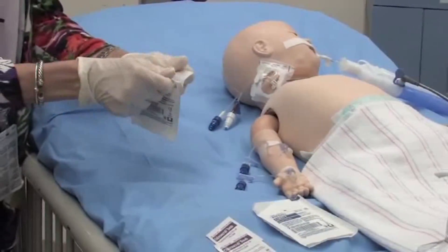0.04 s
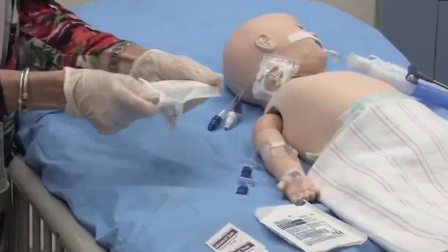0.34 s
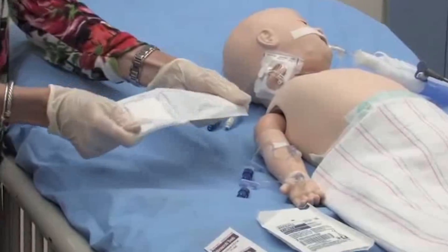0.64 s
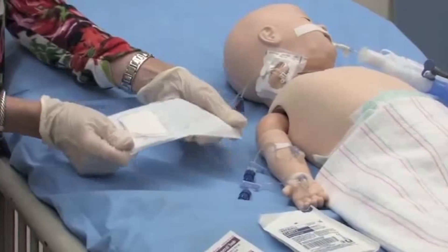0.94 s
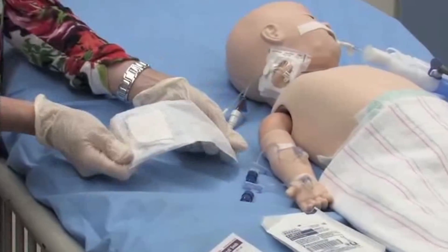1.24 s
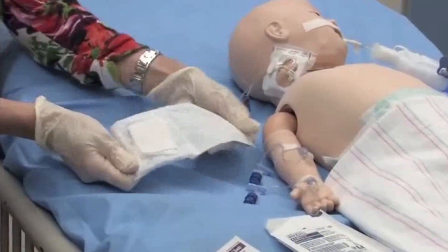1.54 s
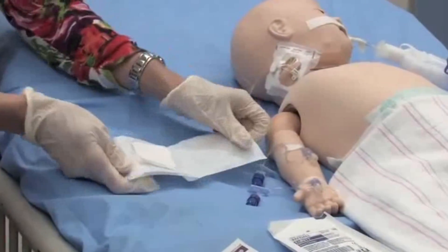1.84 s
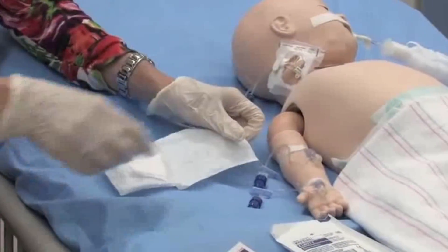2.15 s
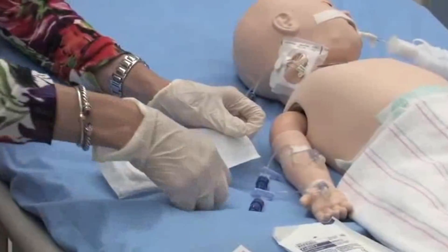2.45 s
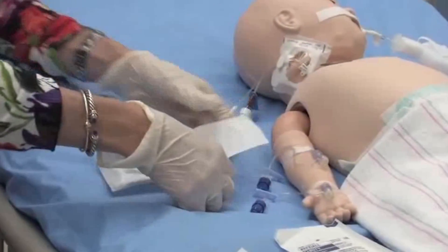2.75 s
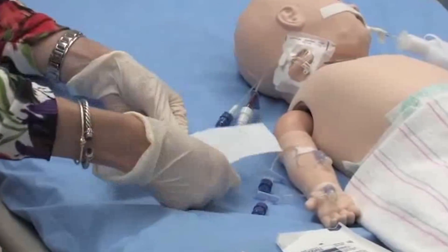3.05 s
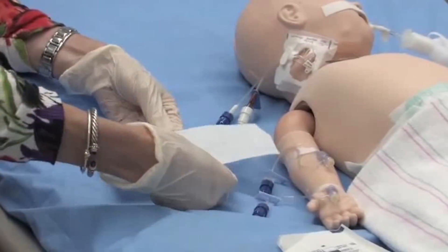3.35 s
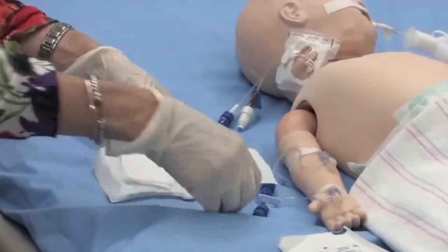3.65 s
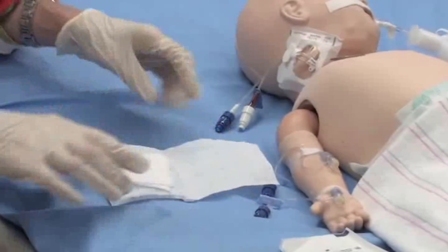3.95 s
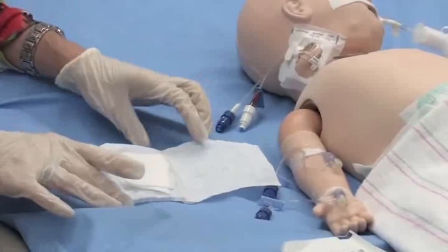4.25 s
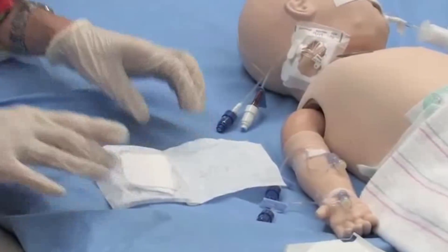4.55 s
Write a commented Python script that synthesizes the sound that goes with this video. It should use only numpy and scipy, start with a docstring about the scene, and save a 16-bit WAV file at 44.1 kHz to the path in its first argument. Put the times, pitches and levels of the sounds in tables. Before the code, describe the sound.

A paper packet is peeled open with a short rip and dense crinkling, then a few lighter crackles and fading rustles on bedding.

```python
"""Gloved hands peel open a paper gauze packet and spread it on a bed, in a small quiet room.
From the start the bedding rumbles under the hands, and stick-slip friction on the cloth hisses.
From 0.3 to 0.8 s the seal tears in a dense run of fibre fractures that drum on the taut paper.
The stiff wrapper buckles in sharp snaps, thickly until 2 s and again around 3 s, both times with
soft pushes on the mattress. Last, paper and gloves slide over the cloth in ever fainter strokes."""
import sys
import numpy as np
from scipy import signal
from scipy.fft import rfft, irfft
from scipy.io import wavfile

SR = 44100
rng = np.random.default_rng(int(sys.argv[2]) if len(sys.argv) > 2 else 0)


def int16_out(signal):
    """Quantize to a 16-bit WAV file."""
    q = np.round(np.clip(np.atleast_2d(signal).T, -1, 1) * 32767)
    wavfile.write(sys.argv[1], SR, q.astype(np.int16))


N = 212253
TIME = np.arange(N) / SR

# background spectrum of the room: f/Hz, level/dB
AIR_SPECTRUM = [(100, -11.5), (200, -9), (450, -13.5), (650, -16), (900, -15.5), (1400, -10.5), (2000, -21),
                (3500, -27), (5500, -23.5), (7500, -41), (10500, -42)]
# hands leaning on the bedding: start t/s, duration/s, rumble level/dB
HAND_LEANS = [(-0.03, 0.097, -40), (0.1, 0.8, -42), (0.88, 0.47, -40.5), (1.653, 0.21, -41.5),
              (1.93, 0.22, -43.5), (2.75, 0.39, -45), (3.23, 0.31, -41), (4.075, 0.12, -46.5)]
# rumble spectrum of the bedding: f/Hz, level/dB
RUMBLE_SPECTRUM = [(10, 0), (25, -5.5), (40, 1.5), (60, -5.5), (92, -12), (120, -5), (200, -15.5),
                   (320, -17), (500, -29.5), (1000, -40.5), (3000, -78.5)]
# soft pushes on the mattress: t/s, level/dB, f/Hz
MATTRESS_PUSHES = [(0.809, -27, 60), (1.101, -28, 65), (2.779, -31.5, 55), (3.249, -25.5, 52),
                   (3.491, -30.5, 50)]
# strokes over the cloth: start t/s, duration/s, hiss level/dB, flexing level/dB, fizz level/dB re hiss
CLOTH_STROKES = [(-0.03, 0.031, -41, -42.5, -6), (0.036, 0.04, -54.5, -44, 0),
                 (0.112, 0.17, -45, -44, -5.5), (0.292, 0.4, -34, -39.5, 0), (0.766, 0.074, -33, -35, -5),
                 (0.878, 0.098, -38, -34.5, -9.5), (1.079, 0.13, -35, -34.5, -11),
                 (1.265, 0.098, -47, -47.5, -11), (1.5, 0.07, -79, -53, -15), (1.601, 0.13, -53, -47.5, -3),
                 (1.75, 0.073, -45.5, -43.5, -12), (1.868, 0.086, -55.5, -56.5, -12),
                 (1.921, 0.24, -44, -51, -9), (2.252, 0.025, -60, -60.5, -13),
                 (2.38, 0.032, -63.5, -71, -15), (2.495, 0.051, -51, -57, -8.5),
                 (2.577, 0.045, -52, -55, -7), (2.734, 0.15, -48, -49, -3.5),
                 (2.914, 0.041, -41.5, -47, -5.5), (2.973, 0.14, -50.5, -52, -4),
                 (3.144, 0.065, -56.5, -52.5, -8), (3.231, 0.052, -43, -40, -17),
                 (3.309, 0.15, -54, -50.5, -16), (3.548, 0.2, -47, -48, -11),
                 (3.775, 0.16, -50.5, -55.5, -9.5), (4.06, 0.062, -62.5, -58.5, -13),
                 (4.168, 0.17, -60, -64.5, -9), (4.394, 0.04, -60.5, -77, -11),
                 (4.564, 0.036, -63, -62, -16.5), (4.722, 0.099, -66, -63.5, -18)]
# spectrum of fine slips on cloth: f/Hz, level/dB
HISS_SPECTRUM = [(900, -22), (2000, -2.5), (2500, -9.5), (3100, -12.5), (4200, -2), (5200, -4.5),
                 (6300, -4.5), (7500, -5), (8500, -5.5), (10000, -19)]
# spectrum of the high fizz of those slips: f/Hz, level/dB
FIZZ_SPECTRUM = [(3000, -26), (6500, -4.5), (8500, 29), (10300, 7)]
# response of the slack wrapper lying on cloth: f/Hz, level/dB
SLACK_PAPER = [(200, -5), (350, -6), (550, -5.5), (850, -3.5), (1300, 3), (1700, 0), (2200, -10),
               (3200, -21), (6000, -61.5)]
# clear buckles of the wrapper: t/s, crack level/dB, crack f/Hz, ring level/dB re crack, ring f/Hz
BUCKLES = [(0.009, -32, 3560, -18, 1410), (0.093, -36, 3900, 0.5, 1100), (0.118, -29, 4700, -4, 895),
           (0.134, -25.5, 4000, -7.5, 1030), (0.204, -36.5, 3700, 0, 1220), (0.244, -29, 3780, 2.5, 1410),
           (0.252, -24, 4660, -9, 1090), (0.2906, -25.5, 4200, -16, 1660), (0.2992, -21, 5040, -8, 1050),
           (0.304, -28, 5600, -3, 1020), (0.336, -36, 4800, 10.5, 820), (0.3628, -23, 5140, -10, 1040),
           (0.423, -23.5, 4400, 5, 1020), (0.437, -18.5, 5070, -9, 1170), (0.443, -24, 4500, 2, 1150),
           (0.467, -18, 4400, -1.5, 1000), (0.4723, -19, 4600, -5, 1460), (0.498, -24.5, 4900, 7, 1430),
           (0.507, -34, 4600, 14, 1470), (0.545, -24, 5330, -6.5, 1040), (0.5665, -24, 5800, -4, 1600),
           (0.578, -34, 4400, 11.5, 800), (0.663, -24, 5400, 1.5, 1020), (0.6846, -23.5, 4600, -1.5, 970),
           (0.733, -26, 5470, 1.5, 1060), (0.760, -28.5, 5000, 11, 1420), (0.781, -32.5, 5370, 5, 960),
           (0.8054, -17.5, 5700, 0.5, 1210), (0.818, -21, 5000, 1, 1350), (0.832, -21, 5900, -2, 1300),
           (0.886, -24.5, 5000, -1.5, 1520), (0.9164, -25.5, 5300, 2, 1220), (0.937, -26, 4930, -21, 1430),
           (0.945, -27.5, 5200, 1, 1710), (0.976, -22.5, 5420, 1.5, 1610),
           (1.0246, -24.5, 7200, -11.5, 1340), (1.062, -33, 4930, -10, 1350),
           (1.0984, -26.5, 5060, 4.5, 1390), (1.1014, -19.5, 5050, -1, 1540),
           (1.1178, -21.5, 4970, 4.5, 1090), (1.123, -27, 4720, 7, 1277), (1.1446, -16.5, 5270, 0, 1560),
           (1.1658, -20.5, 4900, -4, 1080), (1.1721, -21, 6500, 2.5, 1520), (1.211, -41, 4600, 15.5, 1250),
           (1.2284, -26, 5650, 1.5, 955), (1.300, -27.5, 4200, 0, 900), (1.318, -26.5, 5100, 4, 1465),
           (1.375, -31, 5070, 1, 1000), (1.4434, -40, 3900, 9, 1270), (1.642, -37.5, 4600, 6, 1410),
           (1.651, -45.5, 4400, 9, 1130), (1.681, -29, 5530, -1.5, 1220), (1.692, -32, 5000, 0, 1510),
           (1.708, -32.5, 5100, 2.5, 1093), (1.749, -31, 5000, 0, 1850), (1.7826, -27.5, 5570, 2, 1510),
           (1.813, -31, 3900, -4.5, 860), (1.823, -32, 5440, 3, 1230), (1.947, -32, 5570, -9, 1100),
           (1.992, -47.5, 4600, 14.5, 1810), (2.614, -48, 4750, 8.5, 1090), (2.738, -40, 4600, -2, 1140),
           (2.7506, -32.5, 5430, -0.5, 1190), (2.7795, -26, 6300, -10, 1080),
           (2.935, -36, 4700, -7.5, 1160), (3.051, -44.5, 4600, 5.5, 1000),
           (3.085, -32.5, 5540, -3.5, 1130), (3.198, -39, 4400, -4, 1230), (3.2195, -37.5, 5000, -2, 1330),
           (3.2447, -17, 6600, -8, 1500), (3.251, -29, 4940, -1, 1440), (3.287, -34.5, 5540, -7, 1200),
           (3.333, -31, 5100, -1.5, 1420), (3.3558, -32.5, 4640, -12, 1470),
           (3.3857, -35.5, 5300, -7, 1500), (3.389, -24.5, 5330, -8.5, 1450),
           (3.4674, -39.5, 4600, -10, 980), (3.5379, -44, 5050, 5, 1560), (3.664, -48.5, 5100, 10.5, 1400),
           (4.084, -41.5, 3970, -2, 2150)]
# the seal tearing in two pulls: t/s, crackle level/dB, drumming level/dB
SEAL_PULLS = [(0.27, -44, -46), (0.31, -33, -42), (0.36, -25.5, -29.5), (0.43, -26, -28), (0.5, -26.5, -32),
              (0.56, -24.5, -30.5), (0.64, -29, -35.5), (0.71, -29, -35), (0.76, -38.5, -41)]
# spectral weighting of the breaking fibres: f/Hz, level/dB
FIBRE_SPECTRUM = [(700, -22), (1700, -6), (2200, -4), (2800, -2), (4000, 2.5), (5500, 2.5), (7500, 2),
                  (10300, -0.5)]
# response of the taut wrapper: f/Hz, level/dB
TAUT_PAPER = [(200, -21.5), (330, -8), (480, -14), (640, -9.5), (850, -1), (1020, -7), (1200, -4.5),
              (1480, 0), (1800, -3), (2200, -13), (3000, -30.5), (6000, -55)]
# reflections from nearby surfaces: delay t/s, level/dB
EARLY_ECHOES = [(.0023, -29.5), (.0043, -19), (.0071, -28), (0.011, -25.5), (.0205, -45), (.0283, -19)]
# reverberation time of the room: f/Hz, T60/s
DECAY_TIMES = [(300, 0.64), (1200, 0.21), (4000, 0.33), (10000, 0.26)]
# spectrum of the diffuse tail, its treble absorbed: f/Hz, level/dB
TAIL_SPECTRUM = [(300, -16), (1300, -11), (2500, -4.5), (5000, -18.5), (10000, -17.5)]
# microphone response, with a deep treble notch: f/Hz, level/dB
MIC_RESPONSE = [(400, 0.5), (900, 4), (1200, -2.5), (1500, -3), (1800, -6.5), (2100, -6), (2700, 0.5),
                (3300, 0.5), (4200, -1.5), (6000, 1), (7000, -4), (7900, -13.5), (8800, 0), (10200, 1)]


def amp(db):
    """Amplitude ratio: a factor of ten for every 20 dB."""
    return 10 ** (np.asarray(db) / 20)


def unit_rms(x):
    """Normalisation to unit mean power."""
    return x / np.sqrt(np.mean(x ** 2) + 1e-20)


def read(points, hz):
    """Interpolation of a table on a logarithmic frequency axis."""
    f, value = np.transpose(points)
    return np.interp(np.log(hz + 1), np.log(f + 1), value)


def add(mix, start_s, sound):
    """Superposition: a sound sums into the mix from start_s on."""
    part = mix[max(round(start_s * SR), 0):][:len(sound)]
    part += sound[:len(part)]


def colour(x, spectrum, size=8192):
    """Minimum-phase filtering shapes the spectrum while clicks keep a sharp front."""
    log_gain = np.log(amp(read(spectrum, abs(np.fft.fftfreq(size, 1 / SR)))))
    response = np.fft.ifft(np.exp(np.conj(signal.hilbert(log_gain)))).real
    return signal.oaconvolve(x, response[:size // 2])[:len(x)]


def band(x, low_hz, high_hz):
    """Causal band-pass filtering: no output precedes its input."""
    return signal.sosfilt(signal.butter(3, [low_hz, high_hz], "band", fs=SR, output="sos"), x)


def resonate(x, hz, width_hz):
    """A damped resonator: the wider its band, the sooner it decays."""
    r = np.exp(-np.pi * width_hz / SR)
    return signal.lfilter([1, 0, -1], [1, -2 * r * np.cos(2 * np.pi * hz / SR), r * r], x)


def gestures(starts, lengths, dbs, attack_share, release_s):
    """Incoherent sources add in power: one envelope for movements that each swell, hold and decay."""
    power = np.zeros(N)
    for start, length, db in zip(starts, lengths, dbs):
        t = TIME - start
        swell = np.clip(t / (attack_share * length), 0, 1)
        release = np.exp(-np.maximum(t - length, 0) / release_s)
        power += (amp(db) * swell * release) ** 2
    return np.sqrt(power + 1e-14)


def impulses(per_s, spread_db):
    """Shot noise: independent clicks of random size and sign."""
    size = amp(spread_db * np.minimum(rng.exponential(1, N), 4))
    return size * rng.choice([-1, 1], N) * (rng.random(N) < per_s / SR)


def grip(rate_hz, depth_db):
    """Amplitude modulation by an uneven grip: a gain that wanders at random."""
    low_pass = 1 / (1 + (np.fft.rfftfreq(N, 1 / SR) / rate_hz) ** 4)
    wander = irfft(rfft(rng.standard_normal(N)) * low_pass, N)
    return amp(depth_db * np.clip(unit_rms(wander), -2, 2))


def steady_noise(spectrum):
    """Filtered white noise takes on the spectrum of the filter; here at unit rms."""
    return unit_rms(colour(rng.standard_normal(N), spectrum))


def room_tone(level_db=-57.5):
    """Stationary noise forms the faint background of the room."""
    return amp(level_db) * steady_noise(AIR_SPECTRUM)


def bedding(resting_db=-47, thump_decay_s=0.019):
    """Forced vibration: the bedding rumbles under the hands; a push starts a damped oscillation."""
    leaning = gestures(*np.transpose(HAND_LEANS), attack_share=0.11, release_s=0.038)
    out = np.hypot(amp(resting_db), leaning) * steady_noise(RUMBLE_SPECTRUM)
    t = TIME[:SR // 2]
    for start, db, hz in MATTRESS_PUSHES:
        add(out, start, -amp(db) * np.sin(2 * np.pi * hz * t) * np.exp(-t / thump_decay_s))
    return out


def stroke_envelopes():
    """Common modulation: hiss, flexing and fizz rise and fall together with each stroke."""
    start, length, hiss_db, flex_db, fizz_db = np.transpose(CLOTH_STROKES)
    return [gestures(start, length, db, attack_share=0.25, release_s=0.044)
            for db in (hiss_db, flex_db, hiss_db + fizz_db)]


def rubbing(hiss, flex, fizz):
    """Stick-slip friction: fine slips of paper and glove on cloth hiss; coarser ones flex the paper."""
    fine_slips = impulses(per_s=7500, spread_db=-0.5) * grip(rate_hz=26, depth_db=2.5)
    coarse_slips = impulses(per_s=2200, spread_db=0.5) * grip(rate_hz=95, depth_db=3.5)
    return (hiss * unit_rms(colour(fine_slips, HISS_SPECTRUM))
            + fizz * unit_rms(colour(fine_slips, FIZZ_SPECTRUM))
            + flex * unit_rms(colour(coarse_slips, SLACK_PAPER)))


def buckling(creases, lead_s=0.0004, size=1024):
    """Elastic instability: a crease gives way in a burst of tiny fractures, and its panel rings."""
    start, db, crack_hz, ring_db, ring_hz = np.transpose(creases)
    noise = rng.standard_normal((len(creases), size))
    # a crease that moves no panel is over sooner; the lengths also scatter at random
    length_s = 0.0012 * np.exp(0.04 * ring_db + 0.55 * noise[:, -1])
    age = 1.32 * TIME[:size] / (length_s + lead_s / 2)[:, None]
    bursts = noise * age ** 2 * np.exp(-1.5 * age)  # the fractures multiply, then die out
    edges, panel_forces = band(bursts, 7870, 10090), band(bursts, 560, 2530)
    # harder, tighter creases have a brighter edge
    edge_db = -7 + 0.37 * (db + 27) + 7.5 * np.log2(crack_hz / 5000)
    # a whole panel flipping over gives a hollow pop: a stronger, narrower ring
    width_hz = np.interp(ring_db, [0, 12], [1300, 480])
    span = 0.004 * SR  # a level gives the energy as rms over 4 ms
    out = np.zeros(N)
    for k in range(len(creases)):
        fractures = band(bursts[k], 0.54 * crack_hz[k], 8130)  # a tight crease reaches less far down
        crack = resonate(fractures, crack_hz[k], width_hz=2900)
        panel = resonate(panel_forces[k], ring_hz[k], width_hz[k])
        panel = resonate(panel, ring_hz[k], width_hz[k])
        for part, part_db in (crack, 0), (edges[k], edge_db[k]), (panel, ring_db[k]):
            gain = amp(db[k] + part_db) * np.sqrt(span / np.sum(part ** 2))
            add(out, start[k] - lead_s, gain * part)
    return out


def crinkles(bending, count=170, scatter_db=3.5, scatter_octaves=0.4):
    """Stress relief: small creases yield at random, as strongly as the paper bends; rows as in BUCKLES."""
    at = ((np.arange(count) + rng.random(count)) * (N - 1) / count).astype(int)
    strength, tightness, hollowness, panel_pitch = np.clip(rng.standard_normal((count, 4)), -2, 2).T
    crack_db = 20 * np.log10(bending[at]) + 4 + scatter_db * strength
    crack_hz = 4600 * 2 ** (scatter_octaves * tightness)
    ring_db = -4.5 + scatter_db * hollowness
    ring_hz = 1150 * 2 ** (scatter_octaves * panel_pitch)
    return np.column_stack([at / SR, crack_db, crack_hz, ring_db, ring_hz])


def pull_envelopes(fade_s=0.024):
    """Envelopes of the seal's crackle and drumming, with exponential fades outside the pulls."""
    t, crackle_db, drum_db = np.transpose(SEAL_PULLS)
    outside_s = np.maximum(t[0] - TIME, 0) + np.maximum(TIME - t[-1], 0)
    return [amp(np.interp(TIME, t, db)) * np.exp(-outside_s / fade_s) for db in (crackle_db, drum_db)]


def patches(breaks, low_hz, high_hz, width_hz, count):
    """Impulse excitation: each break rings one of several paper patches at its natural frequency."""
    patch = rng.integers(0, count, N)
    pitches = np.linspace(low_hz, high_hz, count)
    return sum(resonate(breaks * (patch == k), hz, width_hz) for k, hz in enumerate(pitches))


def peeling(crackle, drum):
    """Fracture: fibres of the seal break in clumps, and each break drums on the taut paper."""
    breaks = impulses(per_s=2400, spread_db=2.0) * grip(rate_hz=61, depth_db=1.7)
    fibres = patches(breaks, low_hz=2300, high_hz=10390, width_hz=870, count=14)
    panels = patches(breaks, low_hz=416, high_hz=1970, width_hz=300, count=7)
    return (crackle * unit_rms(colour(fibres, FIBRE_SPECTRUM))
            + drum * unit_rms(colour(panels, TAUT_PAPER)))


def reverberation(x, build_s=0.0017, size=256):
    """Reflection and absorption: early echoes and a diffuse tail in which the bass lasts longest."""
    hz, t, spectra = signal.stft(rng.standard_normal(SR // 2), SR, nperseg=size)
    decay = amp(-60 * t / read(DECAY_TIMES, hz)[:, None])
    tail = signal.istft(spectra * decay, SR, nperseg=size)[1]
    tail *= 1 - np.exp(-TIME[:len(tail)] / build_s)
    response = colour(tail / np.linalg.norm(tail), TAIL_SPECTRUM)
    for delay_s, db in EARLY_ECHOES:
        add(response, delay_s, amp([db]))
    return signal.fftconvolve(x, response)[:N]


def scene(stray_db=-77, taut_crinkle_db=-5):
    """Sources straight ahead reach both channels alike; only a trace of low rumble differs."""
    hiss, flex, fizz = stroke_envelopes()
    crackle, drum = pull_envelopes()
    bending = flex * flex / np.hypot(flex, hiss)  # a stroke that mostly slides makes few creases
    creases = np.vstack([crinkles(bending + amp(taut_crinkle_db) * drum), BUCKLES])
    paper = buckling(creases) + peeling(crackle, drum)
    mix = room_tone() + paper + reverberation(paper) + rubbing(hiss, flex, fizz) + bedding()
    stray = amp(stray_db) * steady_noise(RUMBLE_SPECTRUM)
    return np.array([mix + stray, mix - stray])


def record(dry, ceiling=0.48, cutoff_hz=10500):
    """Transduction: microphone response, soft saturation of the hardest snaps, then a band limit."""
    heard = np.array([colour(channel, MIC_RESPONSE) for channel in dry])
    heard = heard / (1 + (heard / ceiling) ** 6) ** (1 / 6)
    low_pass = signal.firwin(255, cutoff_hz, window=("kaiser", 8), fs=SR)
    return signal.oaconvolve(heard, low_pass[None], "same", axes=1)


dry = scene()
out = record(dry)
int16_out(out)
```